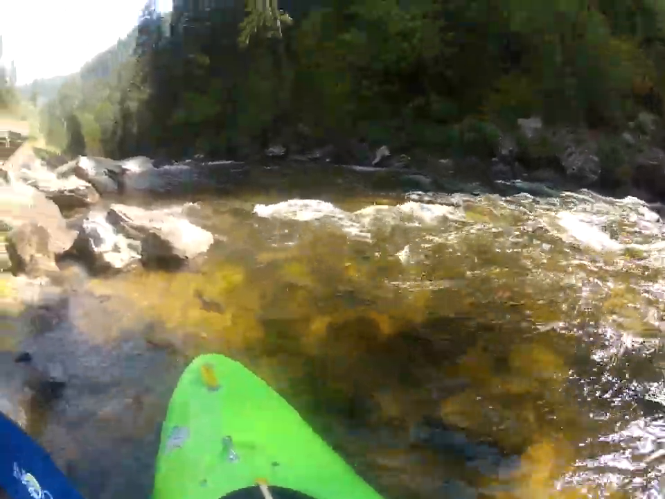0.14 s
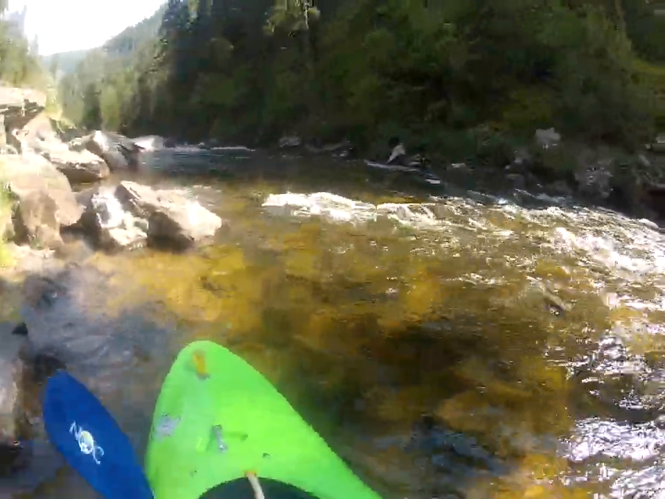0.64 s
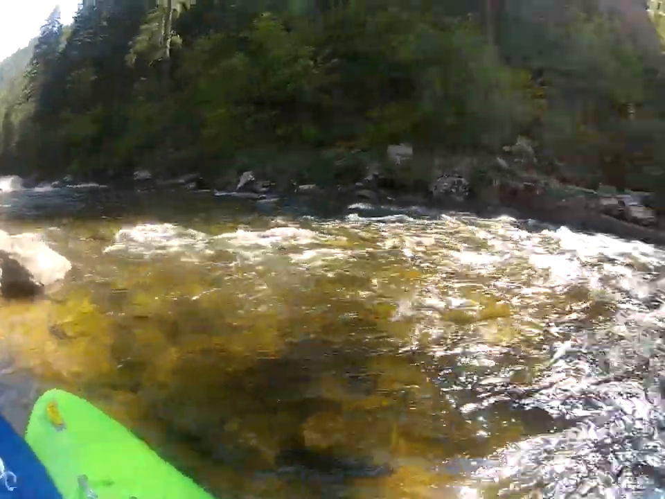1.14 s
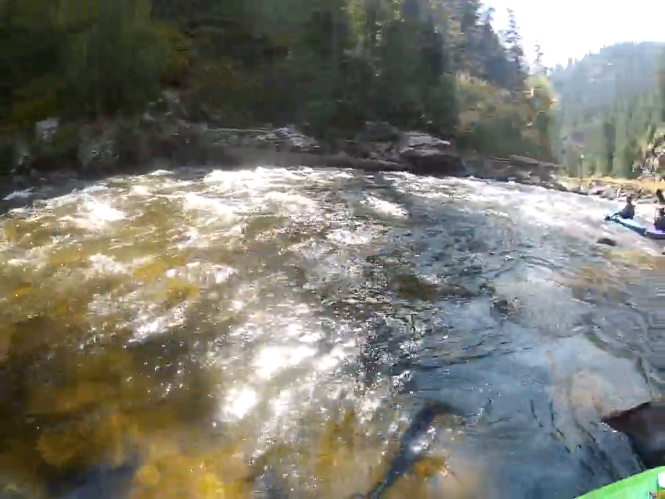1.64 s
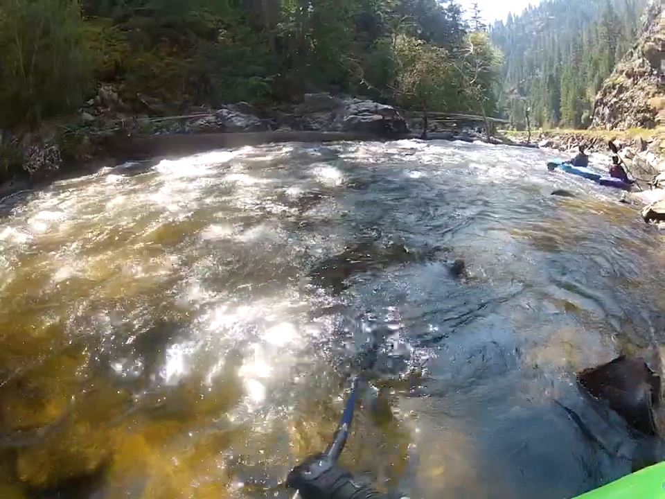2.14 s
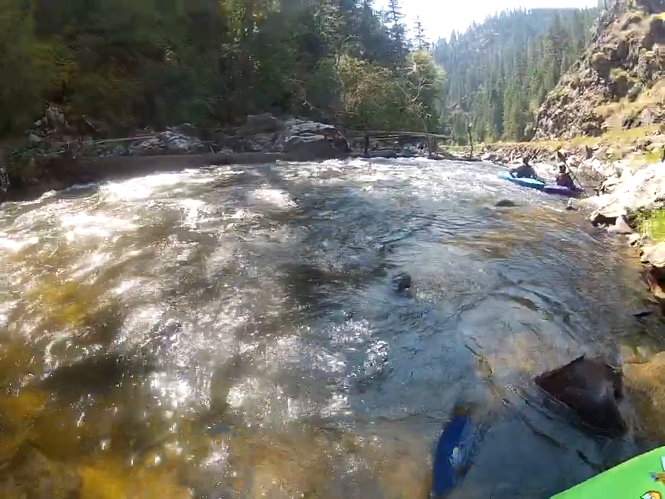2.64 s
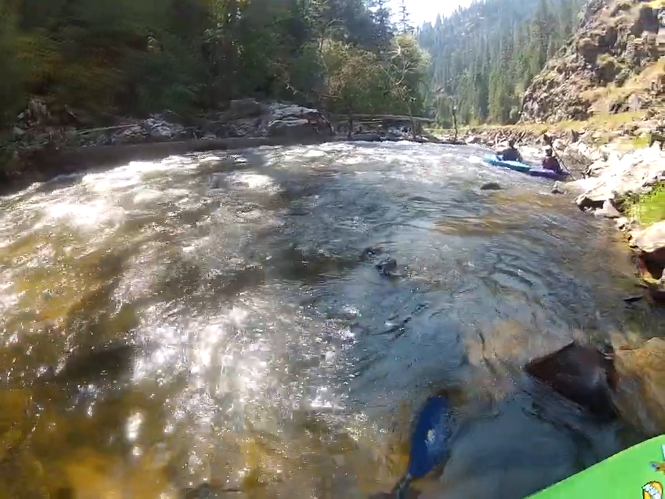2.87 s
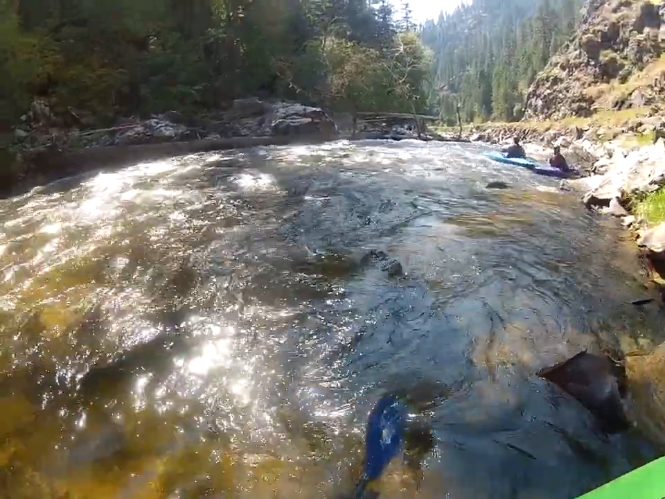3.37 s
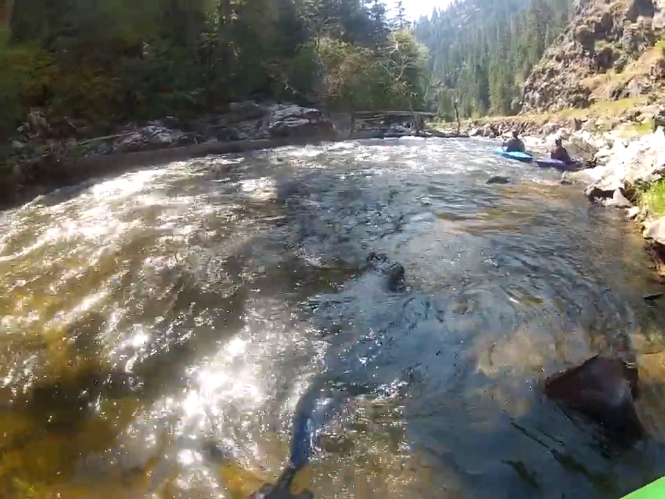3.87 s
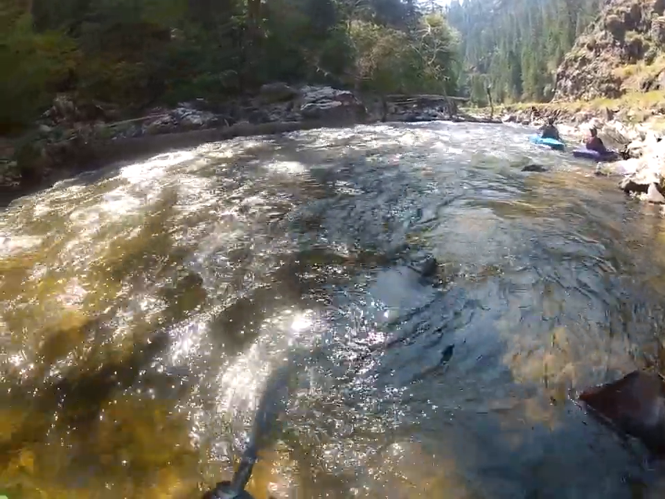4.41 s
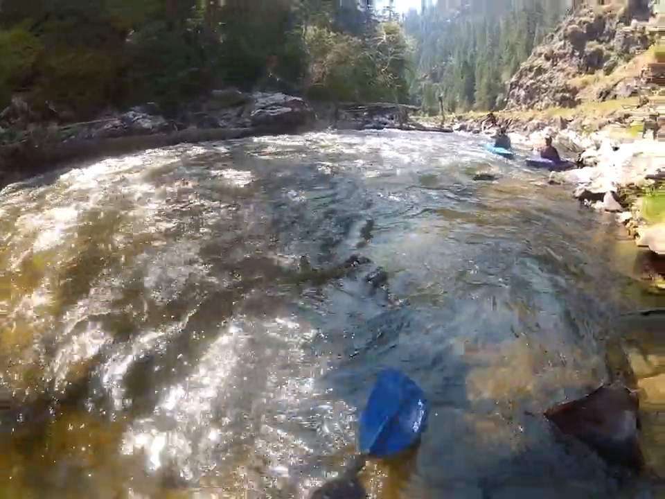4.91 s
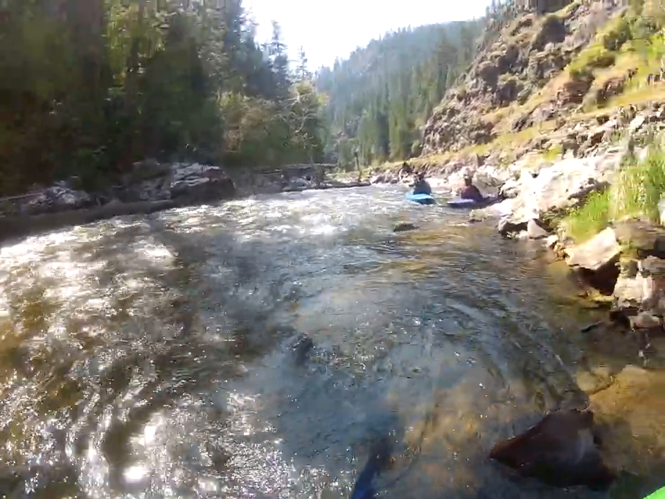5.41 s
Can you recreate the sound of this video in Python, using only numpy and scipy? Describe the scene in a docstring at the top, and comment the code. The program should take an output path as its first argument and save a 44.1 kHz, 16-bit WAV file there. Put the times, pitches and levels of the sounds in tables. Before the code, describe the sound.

Outdoors on a creek, heard through a sealed camera case with dull, coarse treble. Very low boomy thumps of a plastic boat against stone come in the first second, joined by a short rough scrape and dull slaps. Weaker bumps fade out by a second and a half. Faint even water noise continues, with subsonic-like rumbling swells near two seconds and occasional tiny droplet clicks, one clearer just after five seconds.

```python
"""A muffled rush of water in a shallow creek (shaped noise) and a low, lumpy rumble run all through. From 0.4 s
a kayak's hollow hull bumps on a rock (ringing hull and air), grinds over it at about 0.5-0.9 s (dense little
slips ringing the shell), then rocks against it more softly. Dull slaps of the hull on the rock and ticks of
spray (short puffs of noise) are scattered from 0.5 s on. The microphone is in a waterproof case; holding each
12 kHz sample mirrors the sound into the treble."""
import sys
import numpy as np
from scipy import signal
from scipy.io import wavfile
from scipy.ndimage import uniform_filter1d

SR = 44100
rng = np.random.default_rng(int(sys.argv[2]) if len(sys.argv) > 2 else 0)


def invert_db(x):
    """Field ratio 10**(x/20) for x, a level in decibels (scalar or array-like)."""
    u = np.asarray(x, float) / 20
    return 10 ** u


def bounce(signal):
    """Save signal as a 16-bit WAV file at the path given by the first command-line argument."""
    frames = np.transpose(np.atleast_2d(signal))
    limited = np.clip(frames, -1, 1)
    pcm = np.round(limited * 32767).astype(np.int16)
    wavfile.write(sys.argv[1], SR, pcm)


N = 243431


def evened(x):
    """Scales a sound to an average strength (rms) of 1."""
    return x / np.sqrt(np.mean(x ** 2) + 1e-20)


def curve(table):
    """Joins the rows of a table with straight lines, one value per sample for each column after the time."""
    s, *columns = np.transpose(table)
    return [np.interp(np.arange(N) / SR, s, column) for column in columns]


def add(mix, s, sound):
    """Mixes a sound in from time s, cut off at the end of the mix."""
    part = mix[round(s * SR):][:len(sound)]
    part += sound[:len(part)]


def resonate(x, hz, width):
    """One resonance that keeps the level at its own pitch; a narrow width in Hz rings longer."""
    r = np.exp(-np.pi * width / SR)
    return 2 * signal.lfilter([1 - r], [1, -r * np.exp(2j * np.pi * hz / SR)], x).real


def band(x, lo_hz, hi_hz, order=2):
    """Keeps only the sound between two frequencies."""
    sections = signal.butter(order, [lo_hz, min(hi_hz, 0.4 * SR)], "band", fs=SR, output="sos")
    return signal.sosfilt(sections, x)


# Tone colour of the water. Each row: frequency in Hz, relative level in dB per Hz.
RUSH_COLOUR = [(35, -17), (60, 2.5), (152, -1), (313, -3), (735, -13.5), (1030, -8), (1300, -15),
               (2430, -14), (2880, -16), (5600, -31), (7280, -11.5), (12300, -120)]
# Resonances of the case around the microphone. Each row: frequency in Hz, width in Hz, lift in dB.
CASE_RESONANCES = [(1093, 61, 3.5), (1495, 230, 3.5), (2418, 410, 5.5), (3070, 46, 6), (3665, 760, 7.5),
                   (5370, 810, 14)]
# Level of the rush as the boat drifts. Each row: time in seconds, level in dB.
RUSH_SWELL = [(0.0, -55.5), (1.3, -55), (3.7, -56), (5.52, -55.8)]


def rush(patchy_db=0.87, flicker_db=0.58):
    """Distant broken water: random short-time spectra with drifting patches and a shared flicker."""
    frames = N // 128 + 9
    hz = np.fft.rfftfreq(1024, 1 / SR)
    a, b, patches = rng.standard_normal((frames // 2, len(hz), 3)).T
    # Smooth the patches over frequency, then over time.
    patches = uniform_filter1d(patches, 10, 0)
    patches = evened(uniform_filter1d(patches, 8, 1))
    f, level_db = np.transpose(RUSH_COLOUR)
    colour_db = np.interp(np.log(hz + 1), np.log(f + 1), level_db)
    for centre, width, lift_db in CASE_RESONANCES:
        colour_db += lift_db / (1 + (2 * (hz - centre) / width) ** 2)
    spectra = (a + 1j * b) * invert_db(colour_db[:, None] + patchy_db * patches)
    water = evened(signal.istft(spectra, nperseg=1024, noverlap=768)[1][:N])
    flicker = evened(uniform_filter1d(rng.standard_normal(N), 500))
    swell_db, = curve(RUSH_SWELL)
    return invert_db(swell_db + flicker_db * flicker) * water


# Surges of the rumble. Each row: middle in seconds, level at the middle in dB, length in seconds.
RUMBLE_SURGES = [(.62, -57, 0.77), (1.34, -64, .25), (1.752, -68, 0.56), (2.092, -54, 0.18),
                 (2.21, -52.5, 0.092), (2.678, -61, 0.45), (2.852, -58.5, 0.11)]


def rumble(steady_db=-67, lumps_db=3.5, lump_s=0.18):
    """Noise at the bottom of hearing; its power wanders in lumps and rises in a few rounded surges."""
    lumps = evened(uniform_filter1d(rng.standard_normal(N), round(lump_s * SR)))
    power = invert_db(steady_db + lumps_db * lumps) ** 2
    for middle_s, db, length_s in RUMBLE_SURGES:
        surge = invert_db(db) ** 2 * np.hanning(round(length_s * SR))
        add(power, middle_s - length_s / 2, surge)
    return np.sqrt(power) * evened(band(rng.standard_normal(N), 20.0, 43.5))


# Low ringing modes of the hull. Each row: frequency in Hz, level in dB, time to fall by 60 dB in seconds.
HULL_MODES = [(85.1, -0.5, 0.088), (120, -10.5, 0.053), (229.3, -11.5, 0.1), (33, -9, .1)]


def hull_ring(cockpit_t60):
    """The hull's modes feed the air in the cockpit, so the boom swells for a cycle or two before it dies."""
    cockpit_hz = 89
    t = np.arange(SR // 4) / SR
    hull = sum(invert_db(db - 60 * t / t60) * np.sin(2 * np.pi * hz * t) for hz, db, t60 in HULL_MODES)
    air = invert_db(-60 * t / max(cockpit_t60, 0.005)) * np.cos(2 * np.pi * cockpit_hz * t)
    return signal.fftconvolve(hull, air)[:len(t)]


# Bumps of the hull on the rock. Each row: start in seconds, peak level of the boom in dB,
# which way the hull is first pushed, contact time in ms,
# time in seconds for the ringing air in the cockpit to fall by 60 dB (5 ms at least).
HULL_BUMPS = [(0.367, -51, "out", 3.6, .11), (.423, -49, "in", 3.7, 0.088), (0.5238, -19, "in", 6.5, 0.15),
              (0.7069, -24, "in", 2.6, 0.0057), (0.718, -24, "in", 4, .03), (0.783, -43, "in", 2.2, .011),
              (.796, -22.5, "in", 3.3, 0.051), (.802, -13.5, "out", 3.03, 0.048),
              (.983, -50, "out", 2.3, 0.039), (1.236, -43, "out", 3.4, 0.013),
              (1.292, -43, "out", 3.5, 0.036), (1.31, -45, "in", 3.9, .02), (1.351, -37.5, "in", 3.3, 0.12),
              (1.383, -35.5, "in", 2.9, .047), (1.483, -49.5, "out", 4.2, 0.056),
              (1.543, -48, "in", 3.4, 0.044), (2.693, -46, "out", 2.7, 0.0049)]


def bumps(push_db=62):
    """A rounded push of the rock sets the hull booming; the push itself shows as a knock if the ring is short."""
    out = np.zeros(N)
    for s, db, way, contact_ms, cockpit_t60 in HULL_BUMPS:
        push = np.hanning(round(contact_ms * SR / 1000) + 2)
        boom = signal.fftconvolve(push, hull_ring(cockpit_t60))
        add(boom, 0, invert_db(push_db) * push)
        sign = 1 if way == "out" else -1
        add(out, s, sign * invert_db(db) * boom / abs(boom).max())
    return out


# Plastic dragged over stone. Each row: time in seconds, pressure in dB, sliding speed from 0 to 1.
GRIND_PATH = [(.52, -57, 0), (.57, -61, 0.5), (.604, -46.5, 0.36), (.62, -49, 0.46), (.655, -49.5, 0.4),
              (.68, -56.5, 0.73), (.702, -50.5, 0.57), (.719, -48, 0.71), (.735, -41.5, 0.39),
              (.749, -37.5, 0.16), (.765, -50.5, 0.64), (.775, -50, 0.76), (.79, -49, 0.4), (.8, -51, 0.45),
              (.815, -60, 0.6), (.84, -54.5, 0.2), (.865, -73, 0.2), (.89, -65, .5)]
# What the grinding rings with, in four groups: soft contact, hard contact, sand and grit.
# Each row of a group: frequency in Hz, width in Hz, level in dB within the group.
SHELL_GROUPS = [
    [(762, 160, 3), (954, 220, 0.5), (565, 190, -9.5)],
    [(1134, 230, 2.5), (1089, 68, 7.5), (1376, 350, -7.5)],
    [(1815, 290, 3), (2050, 120, -17), (2185, 120, -3), (2356, 107, 4.5), (2800, 500, -12),
     (3050, 350, -11)],
    [(3570, 300, -1.5), (3790, 220, -3.5), (4580, 200, -15), (5350, 490, -12)],
]
# How each group answers, in the same order. Each row: level in dB at rest under the reference pressure,
# dB gained per dB of pressure, dB gained at full speed.
GROUP_CONTACT = [(-46.5, 0.93, -5.5), (-53, 0.88, 6), (-65.5, 1, 23.5), (-66.5, 1.3752, 14.5)]


def grind(booms, slips_per_s=1600, spread_db=2.5, boom_db=4.0, clump_db=3.0, clump_ms=9.0):
    """Dense uneven slips land on different spots of the shell, each with its own mode; the hull drums along."""
    reference_db = -50  # pressure
    drum_db, drum_follows = -46, 0.47  # level under the reference pressure, dB per dB of pressure
    judder_db = -24.5  # how strongly the booms shake the drumming
    start_s, end_s, edge_s = 0.524, 0.89, 0.0087
    t = np.arange(N) / SR
    touch = np.clip(np.minimum(t - start_s, end_s - t) / edge_s, 0, 1)

    def slips():
        """One random train of slips, up or down, bunched in short clumps."""
        clumps = evened(uniform_filter1d(rng.standard_normal(N), round(clump_ms * SR / 1000)))
        uneven = np.minimum(rng.exponential(1, N), 4)
        size = invert_db(clump_db * clumps + spread_db * uneven)
        happens = rng.random(N) < slips_per_s / SR
        return happens * size * rng.choice([-1.0, 1.0], N)

    def rings(modes):
        """Steep resonances, each run twice, with dark valleys between them."""
        return evened(sum(invert_db(db) * resonate(resonate(slips(), hz, width), hz, width)
                          for hz, width, db in modes))

    heavy = slips()
    boom = evened(signal.oaconvolve(heavy, hull_ring(0.0086))[:N])
    drum = evened(band(heavy, 117, 215)) + invert_db(boom_db) * boom
    pressure_db, speed = curve(GRIND_PATH)
    extra_db = pressure_db - reference_db
    shake = uniform_filter1d(abs(booms), size=500)
    load = invert_db(drum_db + drum_follows * extra_db) + invert_db(judder_db) * shake
    shell = np.zeros(N)
    for (rest_db, follows, gain_db), modes in zip(GROUP_CONTACT, SHELL_GROUPS):
        shell += invert_db(rest_db + follows * extra_db + gain_db * speed) * rings(modes)
    return touch * (shell + load * drum)


# Dull slaps on the hull. Each row: start in seconds, level in dB before fading,
# lowest frequency in Hz, highest frequency in Hz, length in ms.
HULL_SLAPS = [(0.527, -45, 700, 2500, 14), (0.705, -38, 150, 530, 6.8), (0.802, -48, 300, 2180, 11),
              (2.691, -49.5, 170, 1730, 32)]
# Spray ticking on the case. Each row: start in seconds, level in dB before fading, pitch in Hz, width in Hz.
SPRAY_TICKS = [(0.796, -45, 3670, 450), (.814, -61, 4700, 400), (1.657, -51, 3300, 3000),
               (1.7, -59, 3400, 2000), (2.102, -51.5, 2320, 700), (2.195, -58, 2928, 2000),
               (2.512, -60, 5100, 600), (2.881, -54, 2000, 300), (5.1387, -43, 5350, 800),
               (5.451, -58, 4500, 2000)]


def spray():
    """Each drop is a short puff of noise around its pitch over a broader splat; slaps are mostly longer and lower."""
    out = np.zeros(N)
    for (s, db, lo_hz, hi_hz, ms), noise in zip(HULL_SLAPS, rng.standard_normal((len(HULL_SLAPS), 3000))):
        puff = band(noise, lo_hz, hi_hz, order=3)[500:][:round(ms * SR / 1000)]  # skip the filter's start
        fade = signal.windows.tukey(len(puff), 0.4) * np.exp(-np.linspace(0, 1.5, len(puff)))
        add(out, s, invert_db(db) * evened(puff) * fade)
    for (s, db, hz, width), noises in zip(SPRAY_TICKS, rng.standard_normal((len(SPRAY_TICKS), 2, 600))):
        # Each part: level in dB, pitch in Hz, width in Hz, length in ms.
        tick = (db, hz, width, 4.5)
        splat = (db - 4, 3300, 3300, 4.3)
        for (part_db, f, w, ms), noise in zip((tick, splat), noises):
            puff = resonate(resonate(noise, f, w), f, w)[100:][:round(ms * SR / 1000)]
            add(out, s, invert_db(part_db) * evened(puff) * np.hanning(len(puff)))
    return out


def scene():
    """All sources add up at one microphone."""
    booms = bumps()
    return (rush() + rumble() + booms + grind(booms) + spray())[None]


def low_pass(x):
    """Removes everything above the highest recorded frequency."""
    return signal.sosfilt(signal.butter(12, 15320, fs=SR, output="sos"), x)


def record(dry):
    """Filters, samples at 12 kHz and holds each sample for four steps of 48 kHz, which mirrors the sound upward."""
    sampling_hz = 12000
    guarded = signal.sosfilt(signal.butter(6, 5500, fs=SR, output="sos"), dry)
    sampled = signal.resample_poly(guarded, sampling_hz, SR, axis=1)
    steps = np.repeat(sampled, 4, axis=1)
    held = signal.resample_poly(steps, SR, 4 * sampling_hz, axis=1)[:, :N]
    edge = signal.firwin(401, 15400, window=("kaiser", 9), fs=SR)  # steep treble limit at 15.4 kHz
    mix = signal.oaconvolve(held, edge[None], "same")
    return low_pass(mix)


dry = scene()
out = record(dry)
bounce(out)
```